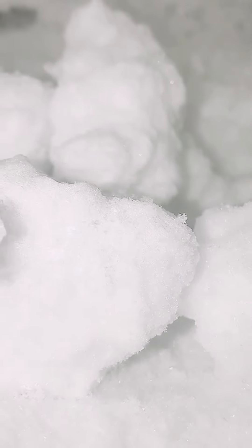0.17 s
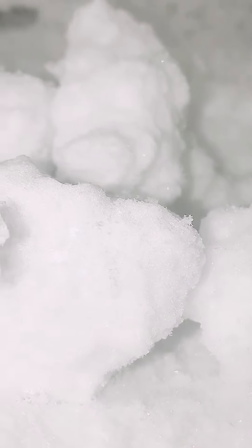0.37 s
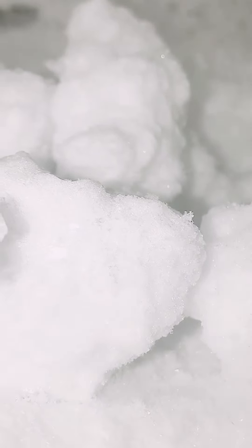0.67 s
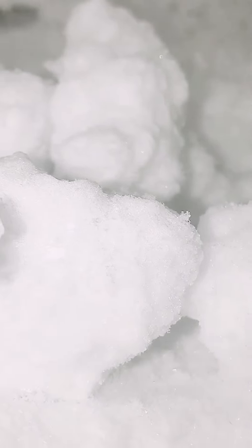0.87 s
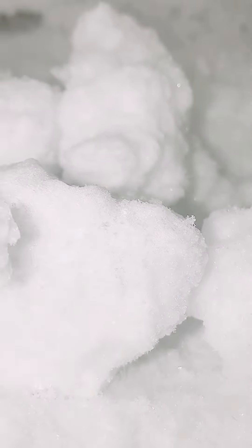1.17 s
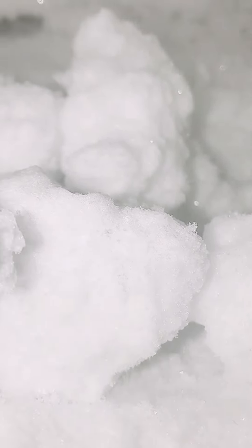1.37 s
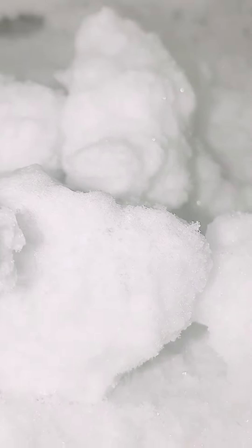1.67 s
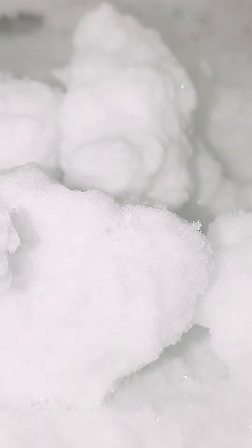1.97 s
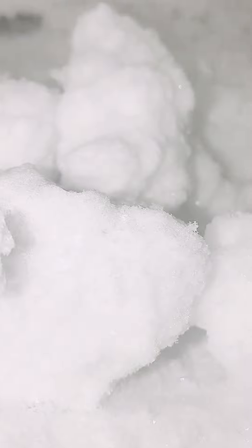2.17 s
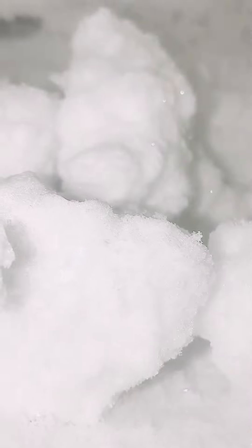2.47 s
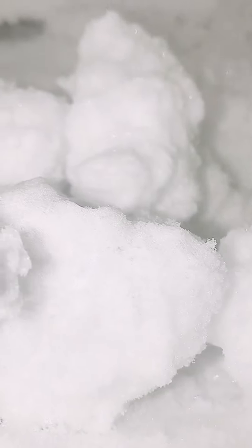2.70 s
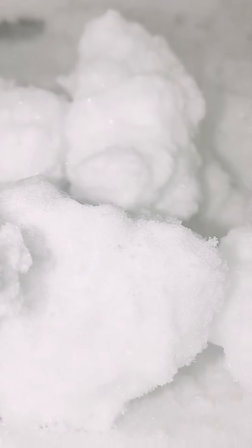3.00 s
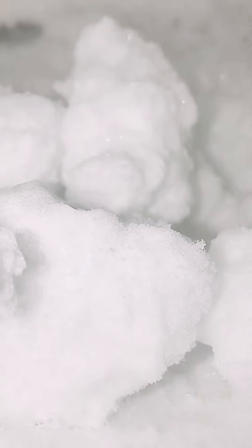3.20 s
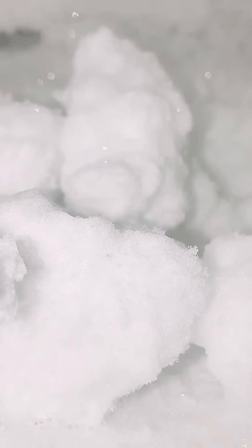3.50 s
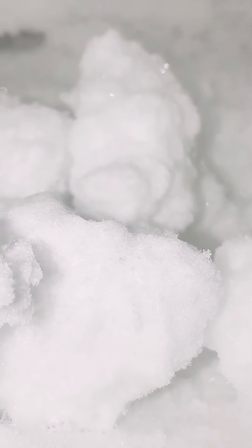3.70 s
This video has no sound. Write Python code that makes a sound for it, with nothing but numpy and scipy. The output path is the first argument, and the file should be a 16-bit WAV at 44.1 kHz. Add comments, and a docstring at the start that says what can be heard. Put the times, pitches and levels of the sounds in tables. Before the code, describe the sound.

Frost is scraped in gritty, uneven strokes inside a hollow freezer, very close to the microphone; chips crackle off early, strokes turn heavier and more hollow midway, then thin out before a sharp crack and low thump.

```python
"""Scraping frost inside a freezer

Frost is scraped in uneven strokes. Crystals crush as a dense train of random impulses, which rings the
icy crust and the hollow box through resonators. Chips snap off as short noise bursts that knock the box.
A hollow tone sinks early on, one crack thumps the wall, the hand on the microphone rumbles,
and steady shaped noise lies beneath."""
import sys
import numpy as np
from scipy import signal
from scipy.fft import rfft, irfft
from scipy.io import wavfile
from scipy.ndimage import uniform_filter1d

SR = 44100
rng = np.random.default_rng(int(sys.argv[2]) if len(sys.argv) > 2 else 0)


def inscribe(sig):
    """Save sig as 16-bit PCM at rate SR to the path in sys.argv[1].

    A 1-D sig is mono; a 2-D sig holds one channel per row.
    Samples are clipped to [-1, 1] before scaling.
    """
    pcm = np.round(np.clip(np.atleast_2d(sig).T, -1, 1) * 32767)
    wavfile.write(sys.argv[1], SR, pcm.astype(np.int16))


N = 169785

# chips snapping off: start_s, level_db (before the common chip or knock gain),
# knock_db and treble_db (both relative to level_db)
CHIP_EVENTS = [(0.368, -16.5, -19, -14), (0.428, -17, -20, -15), (0.484, -15, -23, -26),
               (0.522, -18.5, -20, -25), (0.561, -12.5, -16, -24), (0.595, -8, -13.5, -20),
               (0.632, -8, -14.5, -20), (0.656, -11.5, -17, -23), (0.698, -10, -16, -23),
               (0.719, -9, -12, -22), (0.806, -21.5, -11, -17), (0.837, -8.5, -15.5, -20),
               (0.858, -20, -12, -17), (0.872, -7, -14.5, -12), (0.891, -14.5, -11, -27),
               (0.946, -9.5, -8, -33), (0.954, -4.5, -1, -37), (0.982, -21, -1, -26), (1.014, -12, 7, -29),
               (1.391, -19.5, -5, -22), (1.626, -18.5, -13, -22), (2.022, -15.5, -17, -24),
               (2.186, -18.5, -11, -26), (2.211, -24, -4.5, -25), (2.331, -12.5, -4, -35),
               (2.372, -12.5, -3, -27), (2.699, -17.5, -11, -21), (2.73, -21, -12, -19),
               (2.758, -22, -6, -22), (3.054, -21, -11, -22), (3.232, -16, -9.5, -22),
               (3.4105, -9, -13.5, -21)]
# modes of the hollow box, two low then three high: centre_hz, width_hz, relative_db
BOX_MODES = [(388.7, 55, 7), (331, 54, -2.5), (537, 46, -9.5), (599.3, 68, 8), (670, 145, -9)]


def amp(db):
    """Decibels express a logarithmic amplitude ratio."""
    return 10 ** (np.asarray(db) / 20)


def unit(x):
    """Normalization to rms 1 lets a later gain set the level."""
    return x / np.sqrt(np.mean(x ** 2) + 1e-20)


def in_time(rows):
    """Linear interpolation turns breakpoints into continuous control curves."""
    s, *columns = np.transpose(sorted(rows))
    return [np.interp(np.arange(N) / SR, s, c) for c in columns]


def colour(x, spectrum):
    """Spectral shaping by a (Hz, dB) curve that falls steeply outside its ends; rms 1."""
    hz, db = np.transpose(spectrum)
    log_f = np.log(np.arange(N // 2 + 1) * SR / N + 1)
    below = np.maximum(np.log(hz[0]) - log_f, 0)
    above = np.maximum(log_f - np.log(hz[-1]), 0)
    gain_db = np.interp(log_f, np.log(hz), db) - 60 * (below + above)
    return unit(irfft(rfft(x) * amp(gain_db), N))


def resonate(x, modes):
    """Modal superposition: parallel two-pole resonators with alternating signs."""
    out = 0
    for k, (hz, width, db) in enumerate(modes):
        r = np.exp(-np.pi * width / SR)   # pole radius sets the damping
        zeros = [1 - r * r, 0, r * r - 1]
        poles = [1, -2 * r * np.cos(2 * np.pi * hz / SR), r * r]
        out = out + (-1) ** k * amp(db) * signal.lfilter(zeros, poles, x + 1e-18)
    return out


def drift(corner_hz):
    """Low-pass filtering by two equal poles makes noise a slow random motion; rms 1."""
    r = np.exp(-2 * np.pi * corner_hz / SR)
    noise = rng.standard_normal(N + SR)   # the first second lets the filter settle
    return unit(signal.lfilter([1], [1, -2 * r, r * r], noise)[SR:])


def scrape():
    """Common excitation: one crushing train drives grit, hollow ring and hiss; chips add bursts."""
    # stroke, one stretch per catch of the blade:
    # start_s, grit_db, low_hollow_db, high_hollow_db, hiss_db, treble_db
    catches = [
        [(0.018, -42, -55, -59, -42.5, -42)],
        [(0.028, -29.5, -63, -57, -33, -33), (0.086, -35, -63, -62, -38, -36),
         (0.135, -32.5, -49, -45, -32, -37)],
        [(0.146, -32, -40, -39, -30, -28), (0.162, -20.5, -40, -39, -27, -24),
         (0.314, -33, -56, -38, -34.5, -34.5), (0.358, -53, -56, -53, -58, -50)],
        [(0.37, -43, -44, -42, -36, -39), (0.382, -27.5, -52, -35, -29, -31), (0.404, -63, -58, -64, -54, -48),
         (0.418, -36, -56, -46, -36, -40)],
        [(0.43, -37, -46, -27.5, -24, -31), (0.45, -46, -61, -44, -49, -50), (0.46, -32, -50, -50, -48, -43),
         (0.474, -34, -54, -39, -35, -41)],
        [(0.486, -30, -51, -41, -46, -38), (0.52, -27, -63, -35, -43, -40), (0.71, -30, -56, -30.5, -34, -35.5),
         (0.79, -38.5, -66, -38, -44, -43.5)],
        [(0.812, -40, -58, -33, -51, -50), (0.868, -38, -38, -30.5, -38, -49),
         (0.924, -34.5, -32, -43, -45, -44), (0.94, -24.5, -21, -30, -31, -47)],
        [(0.965, -26.5, -19, -27, -38, -49), (1.127, -19.5, -32, -30, -32.5, -36),
         (1.169, -25.5, -18.5, -34, -28, -53), (1.2, -21.5, -31, -39, -29, -50)],
        [(1.205, -21, -20, -25, -24, -48), (1.247, -18.5, -23, -29, -28.5, -61),
         (1.373, -48, -57, -63, -56, -57), (1.38, -46, -47, -53, -55, -51)],
        [(1.394, -34, -46, -51, -40, -46), (1.458, -24, -41, -31, -37.5, -41),
         (1.594, -32, -54, -34.5, -51, -49), (1.615, -39, -53, -34, -57, -51)],
        [(1.63, -29.5, -44, -35, -44, -39), (1.634, -33, -42, -35, -47, -45),
         (1.706, -20.5, -23, -23, -38, -66), (1.79, -19, -36, -30.5, -30, -45)],
        [(1.795, -23.5, -34, -28, -29, -53), (1.835, -14, -20.5, -25, -16.5, -52),
         (1.85, -34, -43, -32, -32, -56)],
        [(1.855, -30, -35, -42, -40, -64), (1.951, -49, -58, -51, -59, -60), (1.997, -61, -64, -60, -52, -54),
         (2.008, -31.5, -54, -35, -40, -51)],
        [(2.024, -28, -51, -29, -39, -43), (2.098, -37, -56, -45, -47, -47), (2.146, -37, -45, -36, -66, -49),
         (2.25, -33.5, -65, -36, -44, -48)],
        [(2.26, -31.5, -38, -42, -44, -56), (2.34, -22.5, -24.5, -25, -35, -45),
         (2.55, -50, -61, -70, -55, -45.5), (2.562, -37.5, -65, -49, -45, -46)],
        [(2.572, -33, -45, -35, -58, -44), (2.616, -32.5, -44, -37.5, -54, -46),
         (2.728, -36.5, -62, -38, -39, -38.5), (2.745, -40, -60, -44, -60, -46)],
        [(2.761, -44, -73, -43, -52, -44), (2.807, -29.5, -27.5, -36.5, -51, -61),
         (2.85, -26.5, -28, -28, -44, -60), (2.92, -30, -31.5, -33.5, -43, -58),
         (3.042, -59, -60, -62, -63, -52)],
        [(3.058, -38, -48, -35.5, -32.5, -45), (3.11, -34, -63, -43.5, -39.5, -48),
         (3.206, -43, -54, -43, -58, -52)],
        [(3.234, -45, -54, -36, -34, -37), (3.25, -42.5, -52, -43, -53, -50), (3.305, -30, -44, -39, -48, -48),
         (3.36, -26, -30, -27, -44, -44), (3.385, -32, -39, -34, -41, -44), (3.412, -26, -31, -24, -37, -36),
         (3.44, -37.5, -37, -44, -45, -53)],
        [(3.45, -40, -42, -50.5, -54, -44), (3.472, -58, -54, -59, -61, -57),
         (3.518, -54, -68, -40.5, -46.5, -49.5), (3.588, -38, -60, -51, -57, -50)],
        [(3.612, -33, -46, -33, -33, -38), (3.652, -31, -46, -34, -36, -31), (3.664, -37, -55, -38, -40, -36)],
        [(3.672, -36, -42, -45, -52, -47), (3.746, -60, -79, -41, -53, -53.5),
         (3.808, -39, -48, -50, -43.5, -41), (3.85, -50, -44, -47, -55, -56)],
    ]
    # spectrum of the icy hiss: frequency_hz, density_db
    hiss_spectrum = [(4600, 0.5), (5100, -8.5), (5500, 1), (6700, 1.5), (7500, -9.5)]
    # spectrum of the treble: frequency_hz, density_db
    treble_spectrum = [(4410, -48), (7500, 0.5), (9390, 0.5), (10200, -3.5), (13400, -1), (15300, -7.5),
                       (16000, 3.5)]
    chip_hiss_db = -14
    grit_db, low_db, high_db, hiss_db, treble_db = in_time(held(catches))
    burst, bright, knocks = chips()
    crush = grains(grit_db)
    snap = rng.standard_normal(N)
    powder = rng.standard_normal(N)   # too fine to hear as grains
    low, high = box_ring(crush, snap)

    stroke = amp(grit_db) * tilt(crust(crush))
    stroke += amp(low_db) * low + amp(high_db) * high
    stroke += amp(hiss_db) * colour(crush, hiss_spectrum)
    stroke += amp(treble_db) * colour(powder, treble_spectrum)

    chip = burst * (crust(snap) + amp(chip_hiss_db) * colour(snap, hiss_spectrum))
    chip += bright * colour(snap, treble_spectrum)
    return stroke * stalls() + box_knock(knocks, low_db, high_db) + chip


def held(parts):
    """Stick and catch: each stretch keeps its last levels until the blade's next quick catch."""
    catch_s = 0.003
    rows = [tuple(row) for part in parts for row in part]
    for before, after in zip(parts, parts[1:]):
        rows.append((after[0][0] - catch_s, *before[-1][1:]))
    return rows


def grains(grit_db):
    """Random impulse train: crystals crush by chance, uneven in size and clumped; rms 1."""
    grains_per_s, size_spread_db, clump_corner_hz = 6000, 2, 45
    sizes = amp(size_spread_db * np.minimum(rng.exponential(1, N), 5)) * rng.choice([-1, 1], N)
    crushed = rng.random(N) < grains_per_s / SR
    # a light touch stutters, a hard one grinds more evenly
    clump_db = np.interp(grit_db, [-36.5, -24], [3, 1])
    clump_rms = np.exp((clump_db * np.log(10) / 20) ** 2)   # expected rms of the clump gain
    clumps = amp(clump_db * drift(clump_corner_hz)) / clump_rms
    return unit(sizes * crushed * clumps)


def crust(x):
    """Forced resonance: broad grit plus the ring of the icy crust; rms 1."""
    # spectrum of the broad grit: frequency_hz, density_db
    grit_spectrum = [(450, -88), (760, 1.5), (845, -8), (1230, -5), (1570, 2.5), (1780, -3), (2390, 0),
                     (4600, -15), (5980, -90)]
    # modes of the icy crust: centre_hz, width_hz, relative_db
    crust_modes = [(1010, 59, 0), (1606, 270, 5), (1916, 92, 0), (2370, 96, 1), (2652, 73, 2),
                   (3180, 224, 4.5), (3587, 154, -2)]
    ring_db = -0.5
    return unit(colour(x, grit_spectrum) + amp(ring_db) * wandering(x, crust_modes))


def wandering(x, modes):
    """Varying modal coupling: each mode swells and fades as the contact moves; rms 1."""
    spread_db, corner_hz = 5, 6.8
    return unit(sum(amp(spread_db * drift(corner_hz)) * resonate(x, [mode]) for mode in modes))


def tilt(x):
    """Shelving by adding or subtracting a zero-phase high-passed copy of the grit."""
    # lift of the upper grit: start_s, lift_db
    upper_lift = [(0, 4), (.4, 7.5), (1, 0), (1.6, -4), (1.85, 2.5), (2.76, -2.5), (2.82, 7), (2.93, 8),
                  (3.05, 0), (3.4, 0), (3.85, -1)]
    high_pass = signal.butter(2, 2700, "high", fs=SR, output="sos")
    upper = signal.sosfiltfilt(high_pass, x)
    return x + (amp(in_time(upper_lift)[0]) - 1) * upper


def box_ring(crush, snap):
    """Cavity resonance: crushing and smooth noise excite the low and high box modes; each rms 1."""
    drive = crush + 0.95 * snap   # the smooth share blurs the grains
    low = unit(resonate(drive, BOX_MODES[:2]))
    high = unit(resonate(drive, BOX_MODES[2:]))
    broad_db = -4
    broad = colour(crush, [(240, 1.5), (500, 8.5), (800, -6.0)])
    return low, unit(high + amp(broad_db) * broad)


def box_knock(knocks, low_db, high_db):
    """Impulse response: a chip's click rings mostly the hollow the blade is over."""
    high_gain_db = 3.5
    high_share = 1 / (1 + amp(low_db - high_db))
    low = resonate(knocks * (1 - high_share), BOX_MODES[:2])
    high = resonate(knocks * high_share, BOX_MODES[2:])
    ring_gain = SR / (4 * np.pi * BOX_MODES[0][1])   # offsets the small impulse gain of a narrow mode
    return (low + amp(high_gain_db) * high) * ring_gain


def chips():
    """Brittle fracture: fast-rising, decaying envelopes of grit and treble, and clicks for the box."""
    burst_gain_db, knock_gain_db = -9.5, -4.5
    attack_s, hold_s, t60_s = 0.0021, 0.0029, 0.027   # decay starts hold_s after the snap
    burst, bright, knocks = np.zeros(N), np.zeros(N), np.zeros(N)
    t = np.arange(N) / SR
    for s, db, knock_db, treble_db in CHIP_EVENTS:
        age = np.maximum(t - s, 0)
        rise = np.minimum(age / attack_s, 1)
        decay_db = -60 * np.maximum(age - hold_s, 0) / t60_s
        shape = rise * amp(burst_gain_db + db + decay_db)
        burst += shape
        bright += shape * amp(treble_db)
        knocks[int(s * SR)] = amp(db + knock_db + knock_gain_db)
    return burst, bright, knocks


def stalls():
    """Stick-slip gain: the blade sticks before each snap, is freed by it, then loses bite just after."""
    stall_db, stall_s = -3, 0.018   # sinks over stall_s, then stays down for half as long
    slump_db, slump_s = -3, 0.012   # deepest slump_s after the snap, over at twice that
    t, db = np.arange(N) / SR, np.zeros(N)
    for s, *_ in CHIP_EVENTS:
        stall = np.clip(1.5 - (s - t) / stall_s, 0, 1) * (t < s)
        slump = np.clip(1 - np.abs((t - s) / slump_s - 1), 0, 1)
        db = np.minimum(db, stall_db * stall)
        db = np.minimum(db, slump_db * slump)
    return amp(db)


def sweep():
    """Quadrature modulation: two slow noises on a sinking carrier make a narrow hollow band."""
    # sinking hollow tone of the early scraping: start_s, centre_hz, level_db
    glide = [(.07, 1117, -45), (.1, 1091, -31.5), (.14, 1013, -41), (.17, 1006, -25), (.23, 849, -33.5),
             (.31, 651, -37), (.35, 609, -65)]
    corner_hz = 150   # of the slow noises, on each side of the carrier
    hz, db = in_time(glide)
    phase = 2 * np.pi * np.cumsum(hz) / SR
    band = drift(corner_hz) * np.cos(phase) + drift(corner_hz) * np.sin(phase)
    return amp(db) * band * (db > glide[0][2])   # silent at or below the starting level


def thump():
    """Damped free vibration: a bright crack sets the wall swinging, sharp at first, then settling."""
    # overtones of the wall: frequency_hz, relative_db, t60_s
    overtones = [(213, -16, .1), (282, -24, .3), (387, -24, 0.18)]
    # spectrum of the crack: frequency_hz, density_db
    crack_spectrum = [(2800, -5), (3800, 2), (7000, -4.5), (13000, -4.5), (16000, -16)]
    crack_start_s, crack_db, crack_t60_s = 3.6015, -15.5, 0.081
    start_s, swing_db, rise_s, t60_s = 3.606, -3, 0.012, 0.25
    wall_hz, bend_hz, bend_s = 145, 215, 0.005   # pitch starts bend_hz above wall_hz
    t = np.arange(N) / SR
    age = np.maximum(t - start_s, 0)
    turns = wall_hz * age + bend_hz * bend_s * (1 - np.exp(-age / bend_s))
    swing = amp(-60 * age / t60_s) * np.sin(2 * np.pi * turns)
    for hz, db, overtone_t60_s in overtones:
        swing += amp(db - 60 * age / overtone_t60_s) * np.sin(2 * np.pi * hz * age)

    since = np.maximum(t - crack_start_s, 0)
    crack_gain = (since > 0) * amp(crack_db - 60 * since / crack_t60_s)
    crack = crack_gain * colour(rng.standard_normal(N), crack_spectrum)
    return crack + amp(swing_db) * (1 - np.exp(-age / rise_s)) * swing


def handling():
    """Structure-borne noise: the hand's lumpy low rumble, and a resonant hum where it shakes the wall."""
    # handling levels: start_s, rumble_db, wall_hum_db
    handling_levels = [(0.0, -18.5, -29), (0.03, -22, -55), (0.16, -26, -37), (0.2, -25.5, -50),
                       (0.49, -26, -38), (0.56, -18.5, -27.5), (0.6, -31, -60), (0.64, -26.5, -35),
                       (0.72, -33.5, -47.5), (0.84, -24, -36), (0.96, -29, -44), (1.11, -26, -63),
                       (1.15, -27, -45.5), (1.25, -30.5, -48), (1.31, -21, -37), (1.36, -34, -52),
                       (1.39, -28, -36.5), (1.85, -24.5, -42), (1.9, -18.5, -60), (1.93, -12.5, -59),
                       (1.97, -22, -66), (1.99, -30, -46.5), (2.4, -27.5, -45.5), (2.43, -16.5, -29.5),
                       (2.51, -21, -56), (2.69, -22.5, -27), (2.83, -29, -45.5), (3.34, -30, -47),
                       (3.42, -25, -33), (3.45, -23, -38), (3.48, -33, -39), (3.54, -20, -37),
                       (3.58, -41, -50), (3.62, -23, -39), (3.74, -28, -39), (3.85, -34, -32.5)]
    # spectrum of the rumble: frequency_hz, density_db
    rumble_spectrum = [(18, -7), (28, -0.5), (40, -3), (55, 1), (70, 0), (85, -6), (102, -15.5), (120, -15)]
    rumble_db, hum_db = in_time(handling_levels)
    wall_hz = 142.4
    hum = resonate(rng.standard_normal(N), [(wall_hz, 18.4, 0)])
    hum = unit(resonate(hum, [(wall_hz, 60, 0)]))   # a second, wider pass steepens the skirts

    rumble = colour(rng.standard_normal(N), rumble_spectrum)
    size = int(0.074 * SR)   # window over which the level is partly evened
    power = uniform_filter1d(uniform_filter1d(rumble ** 2, size), size)
    rumble = unit(rumble / np.sqrt(power + 0.16))
    return amp(rumble_db) * rumble + amp(hum_db) * hum


def background():
    """Stationary noise: a steady floor with a fixed spectrum."""
    # spectrum of the floor: frequency_hz, relative_db
    floor_spectrum = [(110, -38), (180, 3), (599, -1.5), (839, -0.5), (3180, -7.5), (6260, -13),
                      (8450, -22), (13000, -45), (16000, -40)]
    floor_db = -43
    return amp(floor_db) * colour(rng.standard_normal(N), floor_spectrum)


def scene():
    """Linear superposition of the sources, with a mid-side spread of the treble alone."""
    mid = scrape() + sweep() + handling() + thump() + background()
    band = signal.butter(3, [7500, 9730], "band", fs=SR, output="sos")
    side_db, shimmer_hz = -3, 150
    side = amp(side_db) * signal.sosfilt(band, mid * drift(shimmer_hz))
    return np.array([mid + side, mid - side])


def record(dry):
    """Saturation rounds the peaks under a soft ceiling; a steep low-pass cuts the top."""
    ceiling = 1.5
    rounded = ceiling * np.tanh(dry / ceiling)
    low_pass = signal.cheby2(14, 70, 16200, fs=SR, output="sos")   # 70 dB down from 16200 Hz
    return signal.sosfilt(low_pass, rounded)


dry = scene()
out = record(dry)
inscribe(out)
```